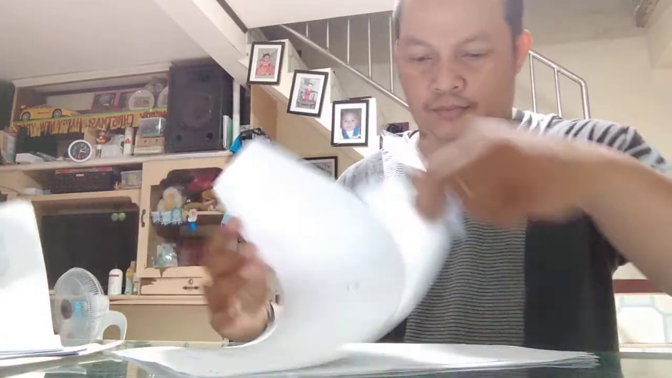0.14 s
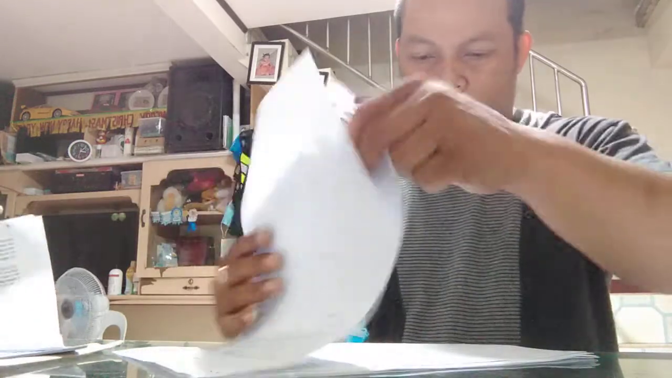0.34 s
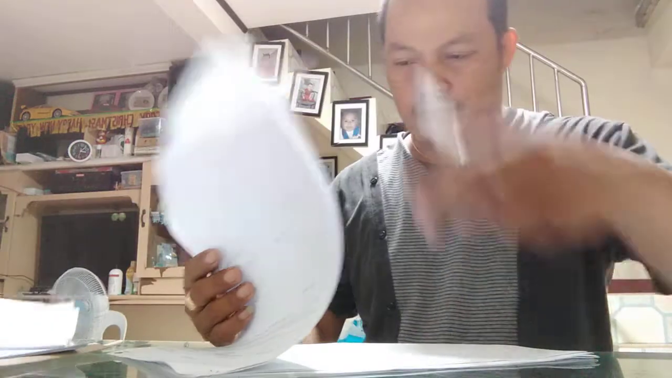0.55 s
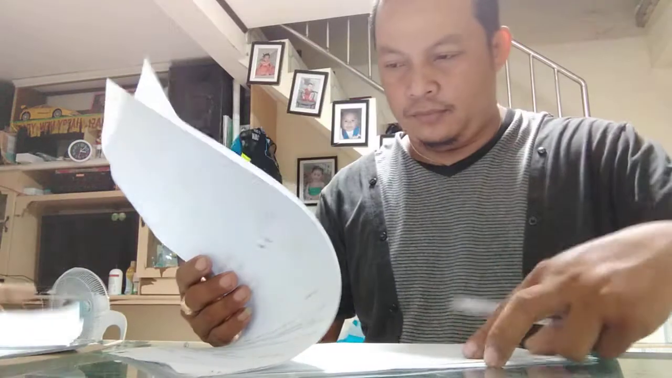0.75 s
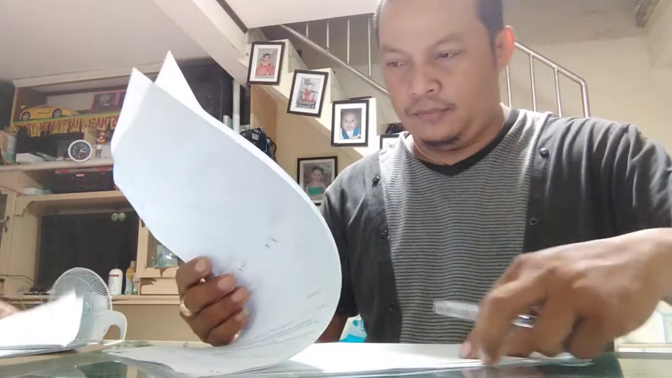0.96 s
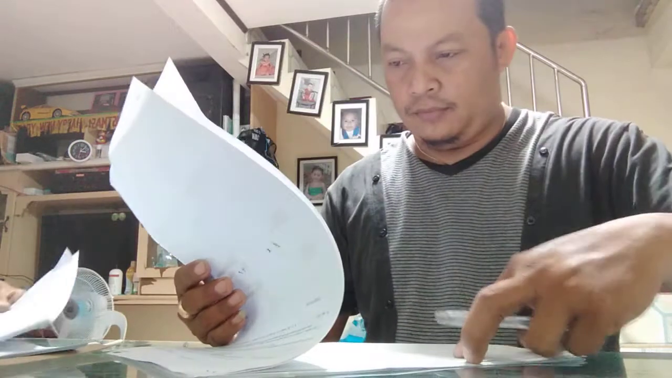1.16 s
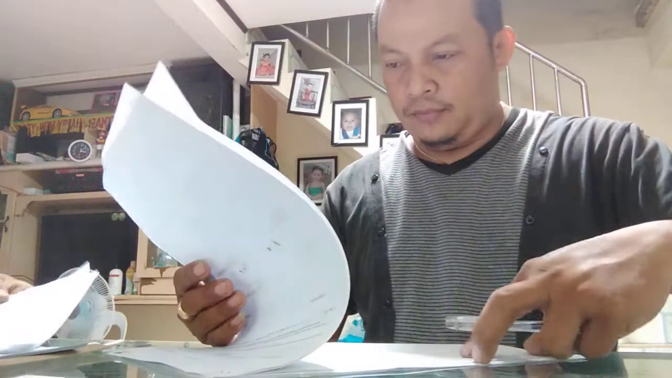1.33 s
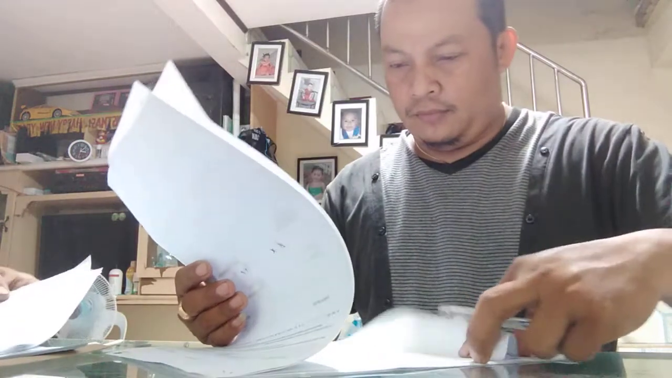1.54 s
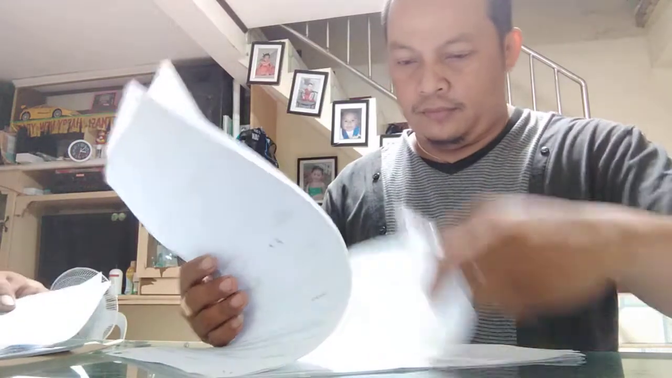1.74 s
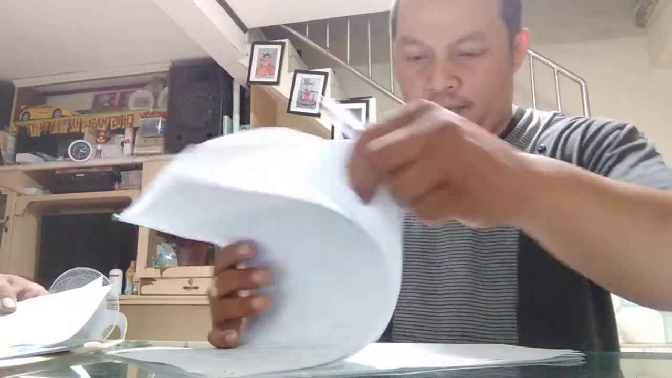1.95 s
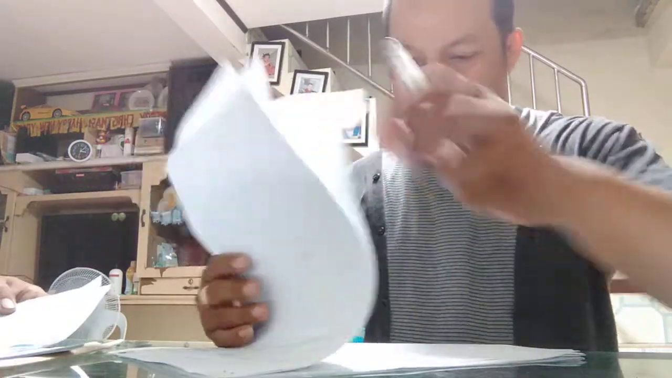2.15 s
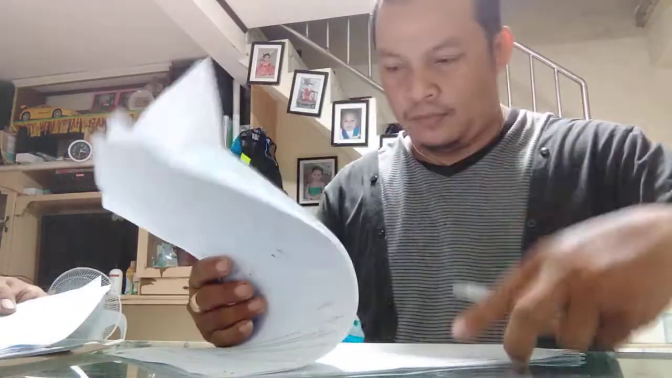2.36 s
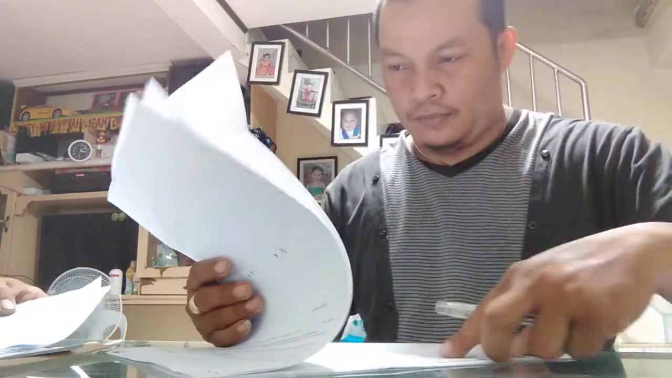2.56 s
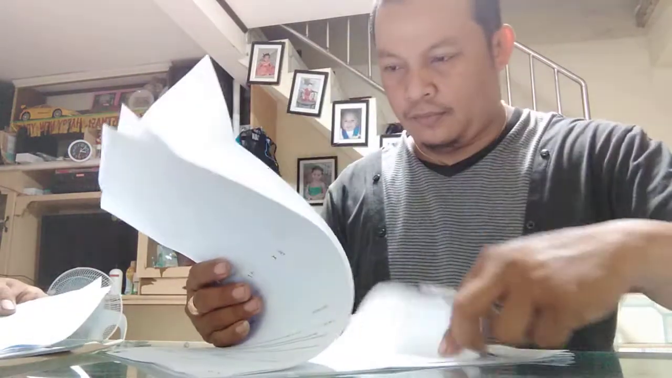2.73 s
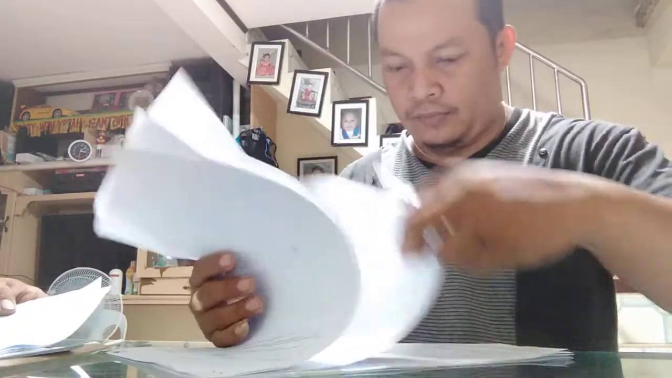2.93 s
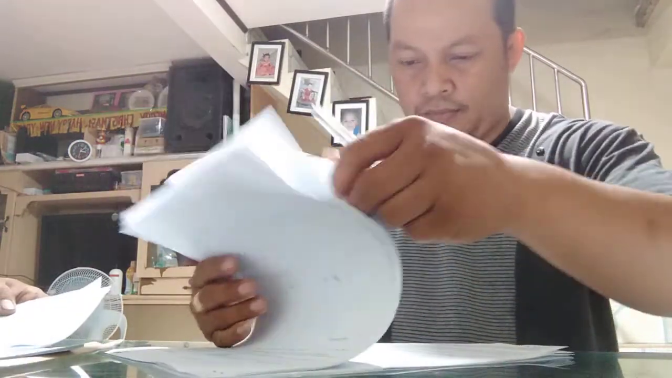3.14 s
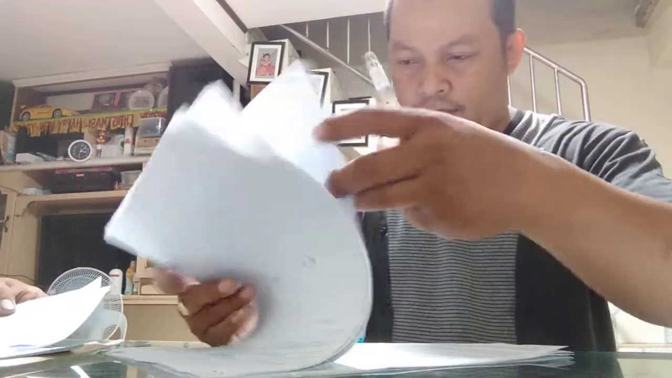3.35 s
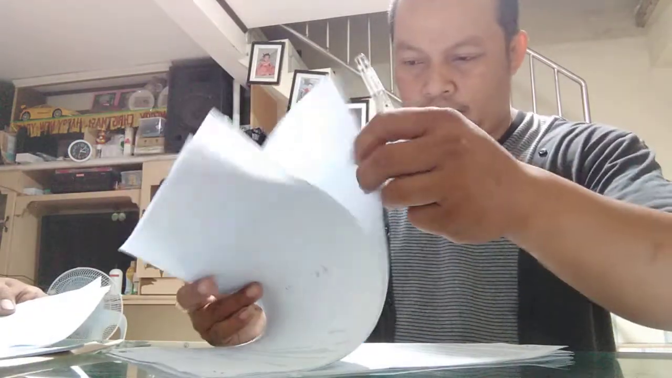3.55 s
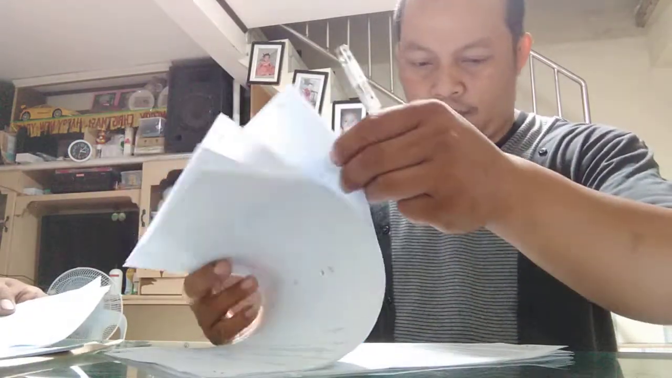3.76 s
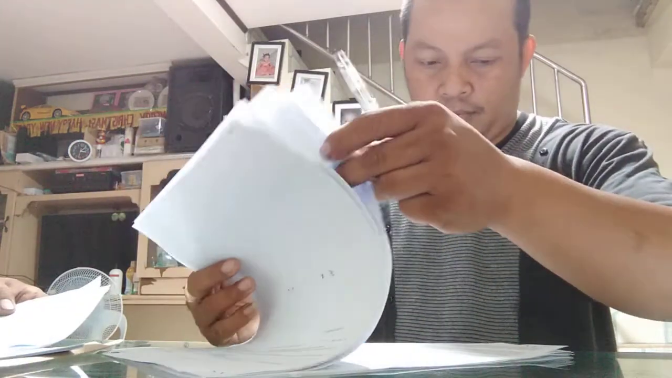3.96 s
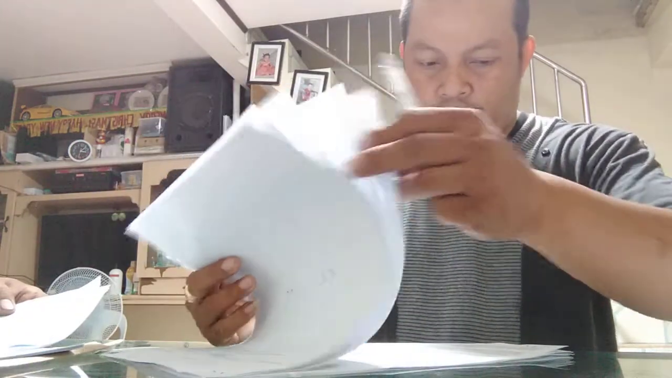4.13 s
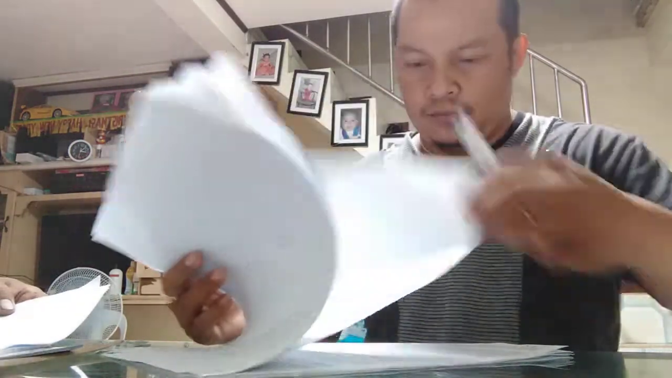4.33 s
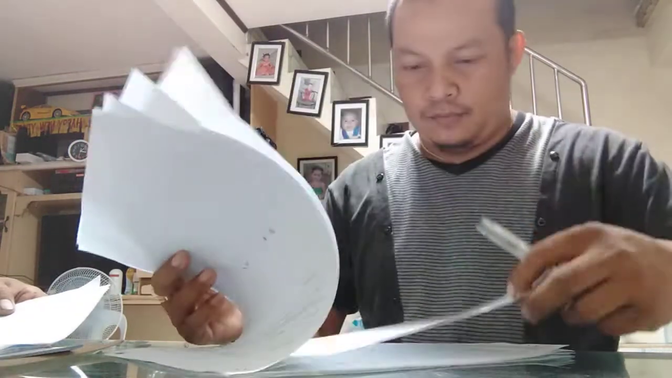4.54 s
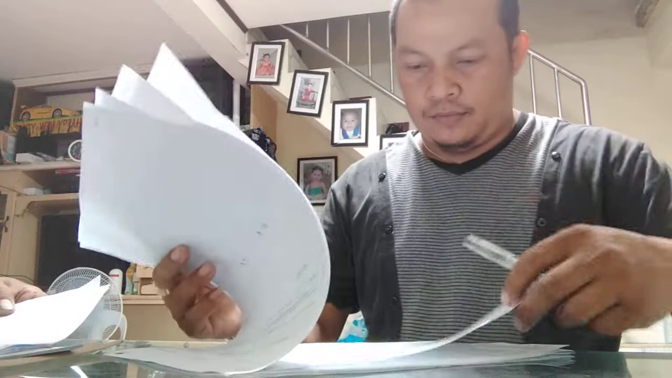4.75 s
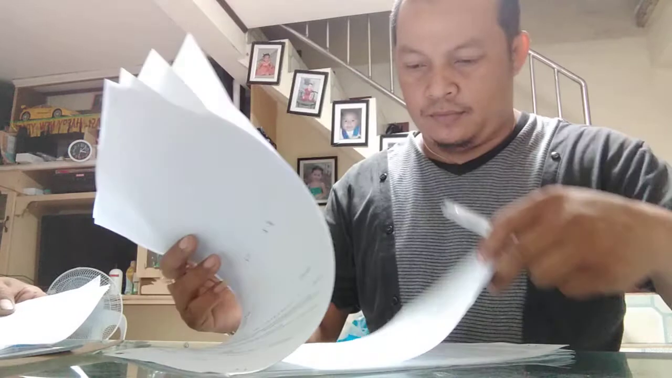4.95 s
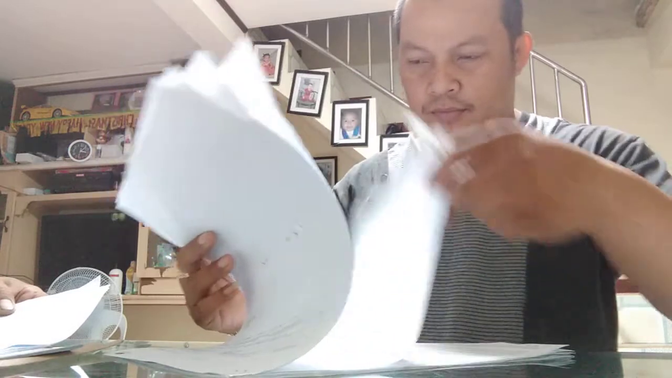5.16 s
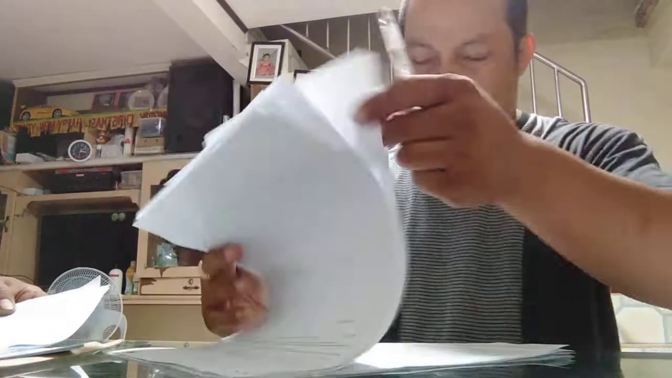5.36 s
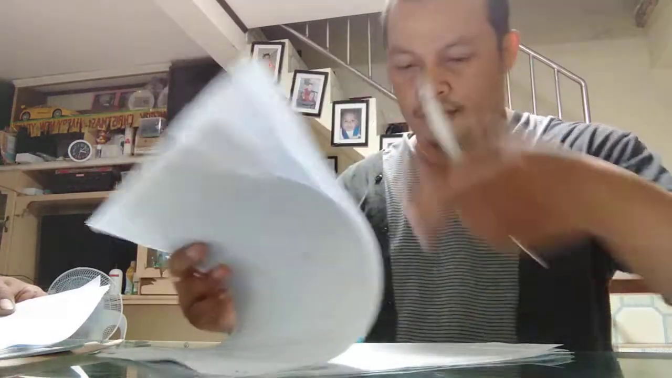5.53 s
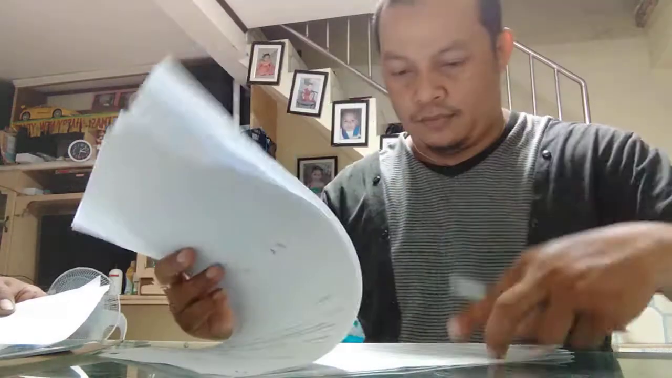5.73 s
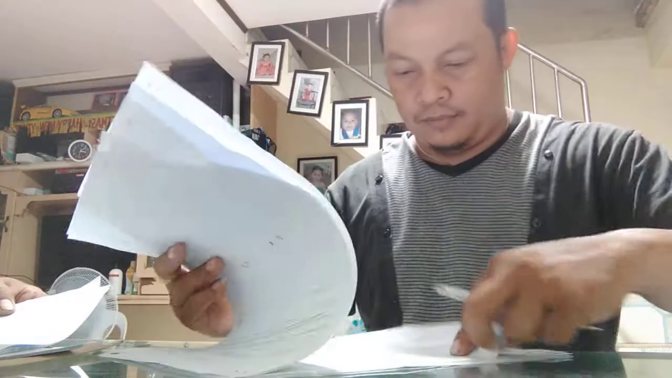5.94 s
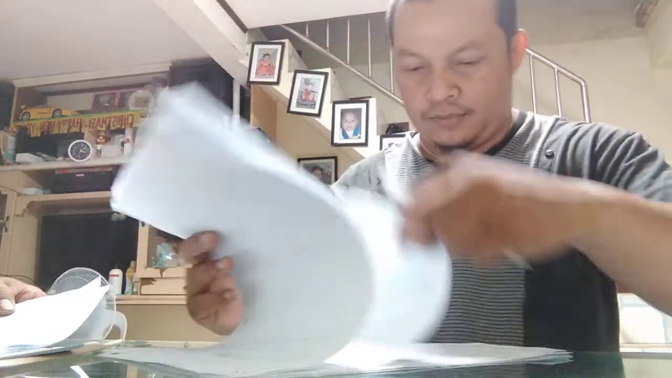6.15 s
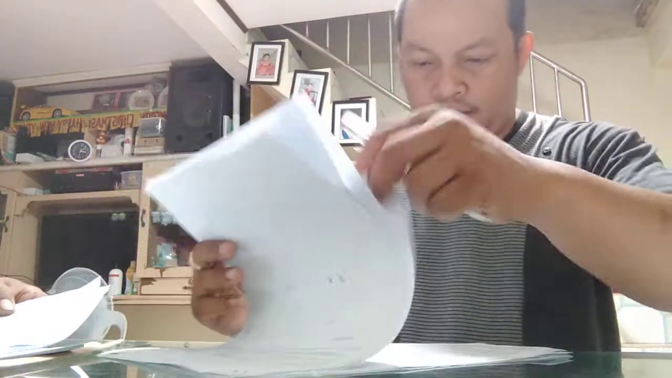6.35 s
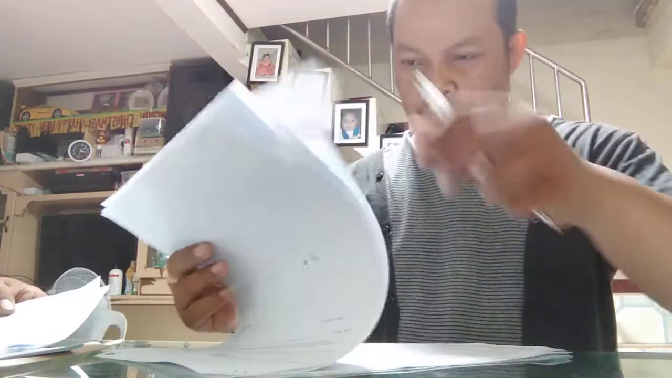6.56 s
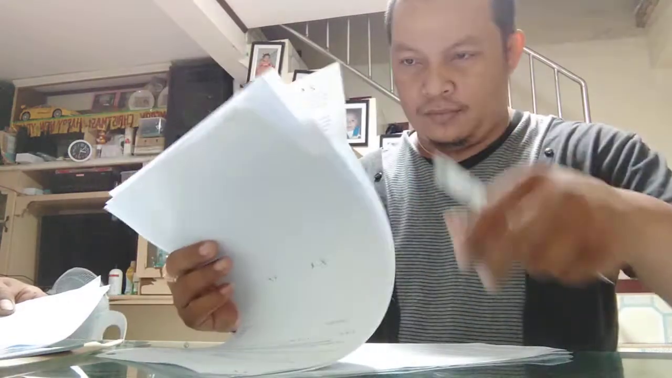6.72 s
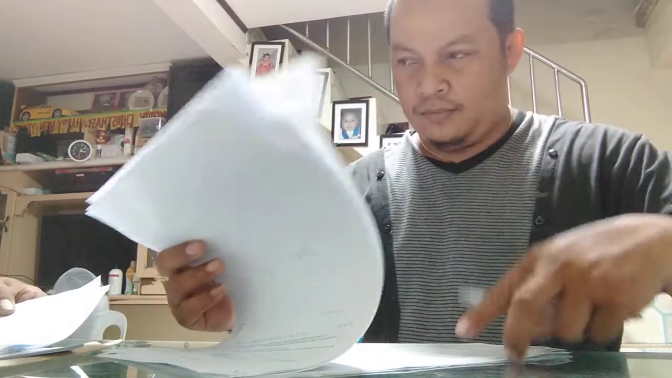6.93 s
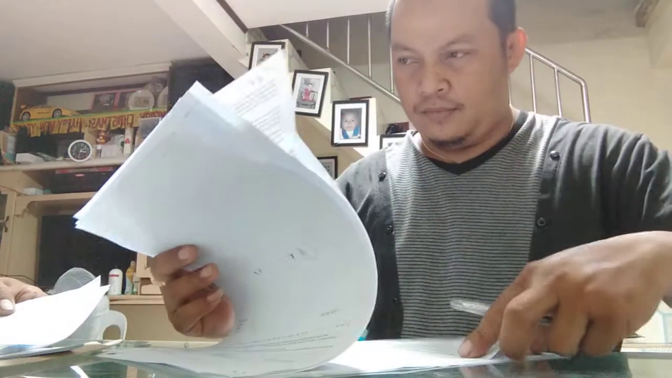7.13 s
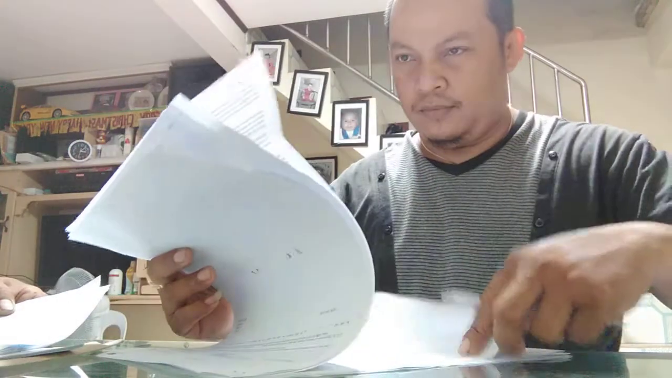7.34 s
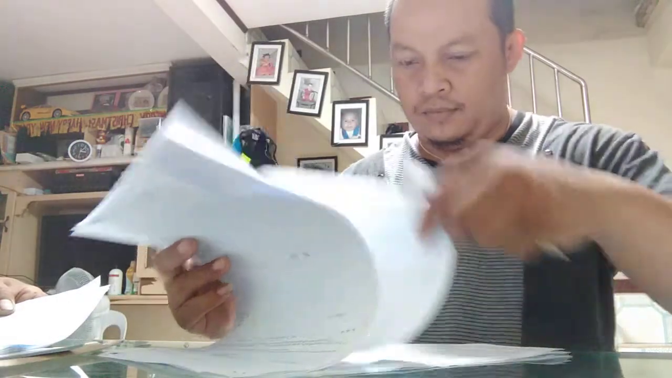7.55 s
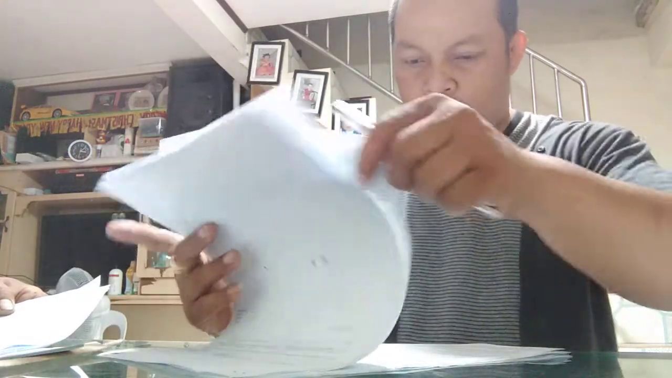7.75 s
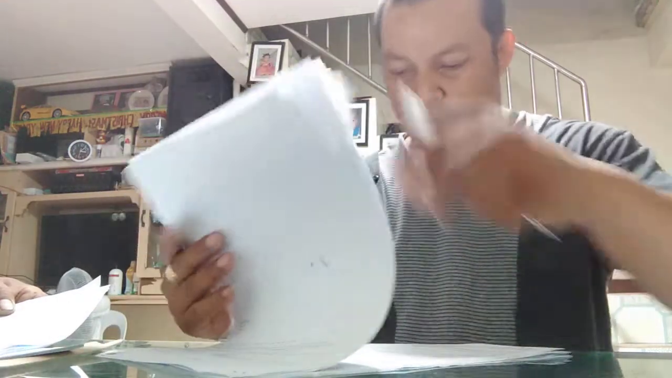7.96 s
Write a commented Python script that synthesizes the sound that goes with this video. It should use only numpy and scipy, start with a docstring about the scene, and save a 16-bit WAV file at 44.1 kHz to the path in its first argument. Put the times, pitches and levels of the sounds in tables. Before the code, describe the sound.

A thick stack of paper sheets is flipped by hand on a glass table, with crisp rustles, sharp snaps and crinkly ticks in a small room.

```python
"""Sheets of paper are slid off a stack on a glass table, lifted and turned by hand in a small hard room.
Sliding faces hiss with fine clicks; strokes of the hand rub and bend a sheet, so it crackles and resonates.
Buckling sheets snap with noise bursts and a low pop; creases tick, edges scuff, and the stack bumps dully.
Sticking and slipping paper gives faint, rough squeaks. Echoes and a short tail surround it all over quiet air."""
import sys
import numpy as np
from scipy import signal
from scipy.io import wavfile
from scipy.ndimage import uniform_filter1d

SR = 44100
rng = np.random.default_rng(int(sys.argv[2]) if len(sys.argv) > 2 else 0)


def materialize(psi):
    """Save the field psi as 16-bit PCM at rate SR to the path in sys.argv[1].

    A 1-D psi becomes a single channel; in a 2-D psi each row is a channel.
    """
    bounded = np.clip(np.atleast_2d(psi).T, -1, 1)
    quanta = np.round(bounded * 32767).astype(np.int16)
    wavfile.write(sys.argv[1], SR, quanta)


N = 356769  # length in samples

# Event levels below are layer gains before envelopes, layer trims and room; colour levels are relative.
# a sheet is drawn across the stack: start_s, length_s, sizzle_db, rub_db
SHEET_SLIDES = [(0, 0.13, -44.5, -51), (1.548, 0.32, -48, -54), (2.668, 0.33, -50.5, -51.5),
                (5.969, 0.26, -49, -48.5), (7.178, 0.52, -55, -56.5)]
# fine hiss of two flat faces: frequency_hz, level_db
SIZZLE_COLOUR = [(3000, -8.5), (6000, 14), (8000, 12.5), (11500, 0.5), (15500, -11.5)]
# quiet air of the still room: frequency_hz, level_db
AIR_COLOUR = [(20, -22), (60, 0), (300, -8), (1500, -20), (15500, -38)]
# the hand moves a sheet: start_s, push_s, glide_s, rub_db, bend_db, lowest_note_hz (of the free sheet)
HAND_STROKES = [(0.043, 0.015, 0.16, -49, -53.5, 430), (0.207, 0.0031, 0.0038, -40.5, -48, 292),
                (0.332, 0.0043, 0.11, -48, -59.5, 249), (0.445, 0.011, 0.17, -46.5, -47.5, 460),
                (0.974, 0.17, 0.03, -56, -68.5, 1640), (1.65, 0.004, 0.26, -50, -52.5, 670),
                (1.964, 0.059, 0.0097, -44.5, -45.5, 314), (2.079, 0.0069, 0.17, -50, -57, 456),
                (3.135, 0.017, 0.24, -61.5, -70.5, 940), (3.31, 0.026, 0.15, -51.5, -59, 630),
                (3.477, 0.0053, 0.19, -51.5, -64.5, 583), (3.802, 0.0086, 0.077, -53, -63, 800),
                (3.913, 0.038, 0.18, -47, -52, 302), (4.207, 0.059, 0.037, -47.5, -66.5, 1530),
                (4.313, 0.0016, 0.024, -65, -50, 450), (4.447, 0.02, 0.01, -44.5, -41.5, 696),
                (4.78, 0.035, 0.008, -54, -58.5, 870), (5.288, 0.012, 0.13, -59.5, -73.5, 360),
                (5.386, 0.012, 0.18, -49, -50, 374), (5.775, 0.0013, 0.04, -41.5, -47, 870),
                (6.154, 0.013, 0.073, -46, -46, 1084), (6.297, 0.014, 0.22, -47.5, -48, 266),
                (6.449, 0.025, 0.25, -51.5, -63, 286), (7.424, 0.0098, 0.047, -52, -54, 543),
                (7.681, 0.0063, 0.095, -46, -59, 1200), (7.874, 0.0047, 0.13, -49.5, -62, 490)]
# fall of the stroke's speed while the sheet glides, then while it settles
GLIDE_DB_PER_S, SETTLE_DB_PER_S = 38, 178
# rubbing edges: frequency_hz, level_db
RUB_COLOUR = [(1300, -26), (2500, -5), (3300, -1), (5200, -4.5), (8000, -8.5), (10000, -18.5), (15500, -44)]
# bending sheet: frequency_hz, level_db
BEND_COLOUR = [(130, -4.5), (380, -7.5), (1000, -7), (2600, -7), (4000, -21), (8000, -39)]
# a sheet buckles: start_s, level_db, pop_db and rub_db (both relative to level_db), t60_s
BUCKLES = [(0.1589, -32.5, -5, 1, 0.053), (0.2788, -28.5, 7, -48, 0.04), (0.565, -35, 24, -24, 0.0061),
           (0.602, -30.5, 10, -28.5, 0.027), (1.8228, -36, 2.5, -10.5, 0.034), (2.22, -32, 6.5, -31, 0.05),
           (4.399, -54, 13, -2.5, 0.1), (4.458, -36.5, -21, -8, 0.022), (5.414, -52.5, 18.5, -2, 0.019),
           (5.543, -35.5, 3, -2.5, 0.016), (6.297, -33.5, 6, 0, 0.018), (6.82, -51, 3.5, -5.5, 0.033),
           (7.438, -39, -7, -3, 0.033), (7.883, -47.5, 5.5, -6, 0.057)]
# crack of a buckling sheet: frequency_hz, level_db
CRACK_COLOUR = [(350, -16), (1400, 3), (2200, 9), (3300, -1.5), (9000, -49.5)]
# pop of the air shoved by a buckle: frequency_hz, level_db
POP_COLOUR = [(110, -25), (260, -10.5), (950, 4), (1500, -3), (6000, -55)]
# a crease or a stiff edge flicks over: start_s, peak_db, pitch_hz
CREASE_TICKS = [(0.156, -19.5, 3540), (0.335, -27.5, 3520), (0.456, -31, 2570), (1.654, -19, 3530),
                (2.123, -31, 3250), (3.2798, -30.5, 3050), (3.8772, -27, 2920), (5.81, -30.5, 2190),
                (5.834, -32.5, 2400), (6.3, -15, 3240), (6.378, -31, 674), (7.415, -31, 2320),
                (7.542, -32, 3200)]
# dull low bumps, mostly of hand and stack (the 0.8 s one a low puff): start_s, level_db, pitch_hz
STACK_BUMPS = [(0.168, -52.5, 139), (0.573, -43, 143), (0.629, -47, 136), (0.801, -50, 95),
               (2.448, -52, 150), (4.015, -52.5, 259), (6.378, -56.5, 144)]
# an edge scuffs the next sheet, or a soft fold gives way: start_s, level_db, pitch_hz
EDGE_SCUFFS = [(0.215, -36.5, 4960), (1.036, -60.5, 2560), (1.45, -51.5, 540), (2.448, -50, 1500),
               (2.857, -52, 1060), (3.487, -49, 900), (3.665, -53, 990), (5.001, -58, 754),
               (5.211, -57, 1000), (6.097, -51, 930), (6.7, -53.5, 503), (6.82, -51.5, 1740),
               (7.192, -57.5, 1396)]
# pitch and level path of the sliding paper's whistle: time_s, pitch_hz, level_db
WHISTLE_PATH = [(0.7, 713, -56.5), (0.82, 752, -57.5), (0.86, 735, -66.5), (0.894, 713.5, -54),
                (1.0, 743, -53), (1.048, 751, -62.5), (1.261, 831, -57), (1.321, 818, -69),
                (1.45, 854, -58.5)]
# faint squeaks and low groans: start_s, length_s, level_db, first_pitch_hz, last_pitch_hz, roughness (0-1)
SQUEAK_GLIDES = [(1.157, 0.13, -55, 617, 642, 0.25), (1.171, 0.53, -68.5, 4130, 4480, 0.8),
                 (2.42, 0.318, -65, 1194, 1170, 0.4), (2.86, 0.18, -57.5, 1138, 969, 0.1),
                 (2.901, 0.14, -62, 1745, 1760, 0.05), (3.928, 0.19, -45, 279.7, 249, 0.35),
                 (4.195, 0.09, -55, 259, 260, 0), (5.116, 0.21, -67, 3686, 3820, 0.26),
                 (5.942, 0.12, -62.5, 548, 520, 0)]
# reverberation: frequency_hz, t60_s
ROOM_DECAY = [(150, 0.35), (12000, 0.43)]
EDGE_HZ = 15600  # cutoff of the closing low-pass


def amp(db):
    """Decibels to gain."""
    return 10 ** (np.asarray(db) / 20)


def evened(x):
    """Scales to an rms of one."""
    return x / np.sqrt(np.mean(x ** 2) + 1e-20)


def read(points, hz):
    """Reads a table on a logarithmic frequency axis."""
    f, value = np.transpose(points)
    return np.interp(np.log(hz + 1), np.log(f + 1), value)


def add(mix, s, sound):
    """Mixes a sound in at time s, in seconds."""
    part = mix[max(round(s * SR), 0):][:len(sound)]
    part += sound[:len(part)]


def decay(t, t60):
    """Envelope that falls by 60 dB in t60."""
    return np.exp(-np.log(1000) * t / t60)


def colour(x, points, size=2048):
    """Causal minimum-phase filter with the given spectrum and unit energy."""
    log_gain = np.log(amp(read(points, abs(np.fft.fftfreq(size, 1 / SR)))))
    spectrum = np.exp(np.conj(signal.hilbert(log_gain)))
    ring = np.fft.ifft(spectrum).real[:size // 2]
    return signal.oaconvolve(x, ring / np.linalg.norm(ring))[:len(x)]


def wander(n, per_s):
    """Random values of rms one, per_s a second, joined by straight lines."""
    at = np.arange(n) * per_s / SR
    return evened(np.interp(at, np.arange(N // 16), rng.standard_normal(N // 16)))


def crackle(per_s, spread_db, smooth, clump_db):
    """Fibres slip in clumps of tiny clicks of uneven size, over a smooth friction noise."""
    sizes = amp(spread_db * np.minimum(rng.exponential(1, N), 4.5))
    slips = rng.random(N) < per_s / SR
    clicks = evened(sizes * rng.choice([-1, 1], N) * slips)
    friction = smooth * rng.standard_normal(N)
    return evened((clicks + friction) * amp(clump_db * wander(N, 70)))


def dragging(start_db=-5, peak_at=0.51, end_db=-16):
    """A sheet dragged flat starts at once, speeds up and lifts away: strength of sizzle and rubbing."""
    sizzle, rub = np.zeros((2, N))
    for s, length, sizzle_db, rub_db in SHEET_SLIDES:
        way = np.linspace(0, 1, int(length * SR))
        speed = amp(np.interp(way, [0, peak_at, 1], [start_db, 0, end_db]))
        speed *= signal.windows.tukey(len(way), .09)
        add(sizzle, s, amp(sizzle_db) * speed)
        add(rub, s, amp(rub_db) * speed)
    return sizzle, rub


def slides(level):
    """Two flat faces sizzle finely as they pass over each other."""
    fine_slips = crackle(per_s=5600, spread_db=-3.5, smooth=0.83, clump_db=2.5)
    return level * colour(fine_slips, SIZZLE_COLOUR)


def still_air():
    """Quiet, steady noise of the room's air, weighted to the lows."""
    return amp(-77) * colour(rng.standard_normal(N), AIR_COLOUR)


def crinkles(per_s, spread_db, cycles, count=36):
    """Small patches of the sheet flick over, each ringing for a few cycles at a pitch of its own."""
    out, t = np.zeros(N), np.arange(SR // 25) / SR
    for hz in np.geomspace(330, 4500, count) * rng.uniform(.95, 1.05, count):
        # high patches ring more briefly and lie farther apart in pitch, so each carries more
        ring = hz * np.sin(2 * np.pi * hz * t) * np.exp(-hz * t / cycles)
        for when, chance in rng.random((int(per_s * N / SR), 2)):
            size = amp(spread_db * min(-np.log(chance), 3))
            add(out, when * N / SR, size * ring)
    return evened(out)


def flexing(x, depth_db, size=512, count=8):
    """The resonances of a sheet shift as its curve changes: random patches of gain in time and pitch."""
    z = signal.stft(x, nperseg=size)[2]
    patches = uniform_filter1d(rng.standard_normal(z.shape), size=5, axis=0)
    patches = uniform_filter1d(patches, size=count, axis=1)
    return evened(signal.istft(z * amp(depth_db * evened(patches)), nperseg=size)[1][:N])


def stroke(push_s, glide_s):
    """Speed through one stroke: rises evenly in the push, slows in the glide, dies away in settling."""
    t = np.arange(int((push_s + glide_s) * SR) + SR // 4) / SR
    gliding = np.clip(t - push_s, 0, glide_s)
    settling = np.maximum(t - push_s - glide_s, 0)
    slowing_db = GLIDE_DB_PER_S * gliding + SETTLE_DB_PER_S * settling
    return np.minimum(t / push_s, 1) * amp(-slowing_db)


def free_span(x, hz, q=1.0):
    """The free part of a sheet rings at its lowest note and gives off little below it."""
    w = 2 * np.pi * hz
    b, a = signal.bilinear([1, 0, 0], [1, w / q, w ** 2], SR)
    return evened(signal.lfilter(b, a, signal.lfilter(b, a, x)))


def rustle(drag, rub_gain_db=-1, bend_gain_db=4.0):
    """Slips and crinkles drive the rubbing edges and the bending sheet; the edges add their own grit."""
    slips = crackle(per_s=800, spread_db=4.5, smooth=.35, clump_db=2.5)
    grit = crackle(per_s=5900, spread_db=1.5, smooth=0.22, clump_db=3.0)
    flicks = crinkles(per_s=22, spread_db=4.5, cycles=4)
    edges = colour(0.72 * slips + grit + 0.038 * flicks, RUB_COLOUR)
    rub = flexing(edges, depth_db=3.0, count=20)
    bend = flexing(colour(slips + 0.39 * flicks, BEND_COLOUR), depth_db=3.2)
    # overlapping drags and strokes add their rubbing as power
    rub_power, bending = drag ** 2, np.zeros(N)
    for s, push_s, glide_s, rub_db, bend_db, note_hz in HAND_STROKES:
        speed = stroke(push_s, glide_s)
        sheet = free_span(bend[round(s * SR):][:len(speed)], note_hz)
        add(rub_power, s, (amp(rub_db) * speed) ** 2)
        add(bending, s, amp(bend_db) * sheet * speed[:len(sheet)])
    return amp(rub_gain_db) * rub * np.sqrt(rub_power) + amp(bend_gain_db) * bending


def snaps(crack_share=0.12, crack_db=12, rise_share=0.022, pop_rise_s=0.0025, pop_ring=2.31,
          bend_db=-5, strain_db=-7, strain_s=0.0011):
    """A buckle strains, cracks and shivers; the air it shoves pops lower and longer."""
    out, t = np.zeros(N), np.arange(SR // 4) / SR
    for s, db, pop_db, rub_db, t60 in BUCKLES:
        rub, bend, pop = rng.standard_normal((3, len(t)))
        age = t / max(t60, .005)
        # a slow buckle both swells and fades slowly
        swell = 1 - np.exp(-age / rise_share)
        blow = swell * (decay(age, 1) + amp(crack_db) * np.exp(-age / crack_share))
        shove = decay(age, pop_ring) * (1 - np.exp(-t / pop_rise_s))
        sound = amp(rub_db) * colour(rub * blow, RUB_COLOUR)
        sound += amp(bend_db) * colour(bend * blow, CRACK_COLOUR)
        sound += amp(pop_db) * colour(pop * shove, POP_COLOUR)
        add(out, s, amp(db) * sound)
        # the strain swells up to the moment of the snap
        lead = t[:SR // 50]
        strain = colour(rng.standard_normal(len(lead)), RUB_COLOUR) * np.exp(-lead[::-1] / strain_s)
        add(out, s - lead[-1], amp(db + strain_db) * strain)
    return out


def ticks(cycles=8.7, below_db=-7, above_db=-8):
    """A small crease or a stiff edge flicks over: a burst of a few cycles, broad around its own pitch."""
    out, t = np.zeros(N), np.arange(SR // 20) / SR
    for s, db, hz in CREASE_TICKS:
        around = [(hz / 8, -28), (hz / 2, below_db), (hz, 0), (2 * hz, above_db), (10 * hz, -72)]
        tick = colour(rng.standard_normal(len(t)) * np.exp(-hz * t / cycles), around)
        add(out, s, amp(db) * tick / abs(tick).max())
    return out


def bumps(thud=0.67, thud_s=0.078, t60=0.22, rise_s=0.0016, below_db=-12, above_db=-13):
    """A soft, uneven push rings around one low note, mostly the bowed stack or the table."""
    out, t = np.zeros(N), np.arange(SR // 2) / SR
    for s, db, hz in STACK_BUMPS:
        ring = np.sin(2 * np.pi * hz * t) * decay(t, t60)
        around = [(hz / 8, -30), (hz / 2, below_db), (hz, 0), (2 * hz, above_db), (10 * hz, -45)]
        push = thud * colour(rng.standard_normal(len(t)) * np.exp(-t / thud_s), around)
        add(out, s, amp(db) * (ring + push) * (1 - np.exp(-t / rise_s)))
    return out


def scuffs(rise_s=0.004, fade_s=0.037, q=2.4):
    """A short run of slips rings a small part of the sheet, broadly around one note."""
    out, t = np.zeros(N), np.arange(SR // 5) / SR
    for s, db, hz in EDGE_SCUFFS:
        b, a = signal.iirpeak(hz, q, SR)
        slips = rng.standard_normal(len(t))
        ring = evened(signal.lfilter(b, a, signal.lfilter(b, a, slips)))
        add(out, s, amp(db) * ring * (1 - np.exp(-t / rise_s)) * np.exp(-t / fade_s))
    return out


def stick_slip(hz, db, rough, waver_hz=22, flutter_db=3, smear_hz=40, smear_share=0.04):
    """Paper sticks and slips: an unsteady tone, part of which smears into a narrow band of scraping."""
    n = len(hz)
    turn = np.exp(2j * np.pi * np.cumsum(hz + waver_hz * wander(n, 260)) / SR)
    # slow complex noise spreads the tone to both sides of its pitch
    b, a = signal.butter(2, smear_hz + smear_share * hz.mean(), fs=SR)
    scrape = signal.lfilter(b, a, rng.standard_normal(n) + 1j * rng.standard_normal(n))
    share = np.clip(rough, 0, 1)
    tone = np.sqrt(1 - share) * evened(turn.real) + np.sqrt(share) * evened((turn * scrape).real)
    return amp(db + flutter_db * wander(n, 110)) * tone / np.sqrt(2)


def squeaks():
    """Stick-slip gives one long, broken whistle, and short squeaks that each glide one way."""
    out = np.zeros(N)
    when, pitch, level = np.transpose(WHISTLE_PATH)
    t = np.arange(when[0], when[-1], 1 / SR)
    whistle = stick_slip(np.interp(t, when, pitch), np.interp(t, when, level), rough=0.15)
    add(out, when[0], whistle * signal.windows.tukey(len(t), .1))
    for s, length, db, first_hz, last_hz, rough in SQUEAK_GLIDES:
        n = int(length * SR)
        squeak = stick_slip(np.linspace(first_hz, last_hz, n), db, rough)
        add(out, s, squeak * signal.windows.tukey(n, .7))
    return out


def room(x, early_db, tail_db, count=9):
    """Table, body and walls return a few quick echoes, along with a diffuse tail."""
    hz, t, z = signal.stft(rng.standard_normal(SR), SR, nperseg=256)
    tail = signal.istft(z * decay(t, read(ROOM_DECAY, hz)[:, None]), SR)[1]
    tail *= 1 - np.exp(-np.arange(len(tail)) / SR / 0.00012)
    echo = amp(tail_db) * tail / np.linalg.norm(tail)
    at = (np.geomspace(.0016, .022, count) * rng.uniform(0.99, 1.2, count) * SR).astype(int)
    echo[at] += amp(early_db) * rng.choice([-1, 1], count) / np.sqrt(count)
    return x + signal.oaconvolve(x, echo)[:N]


def scene():
    """All the paper sounds in the room, over its quiet air; the squeaks carry more of the tail."""
    sizzle, drag = dragging()
    paper = slides(sizzle) + rustle(drag) + snaps() + ticks() + bumps() + scuffs()
    paper_in_room = room(paper, early_db=-7.0, tail_db=-5.5)
    squeaks_in_room = room(squeaks(), early_db=-13.5, tail_db=2.0)
    return (paper_in_room + squeaks_in_room + still_air())[None]


def record(dry):
    """A steep linear-phase low-pass closes off the extreme treble."""
    low_pass = signal.firwin(511, EDGE_HZ, window=("kaiser", 9), fs=SR)
    return signal.oaconvolve(dry, low_pass[None], "same")


dry = scene()
out = record(dry)
materialize(out)
```